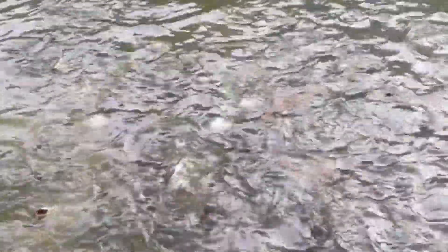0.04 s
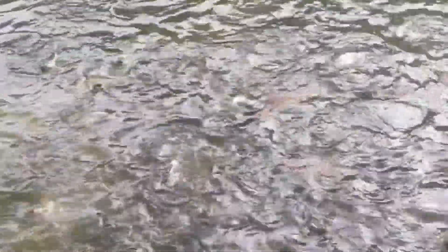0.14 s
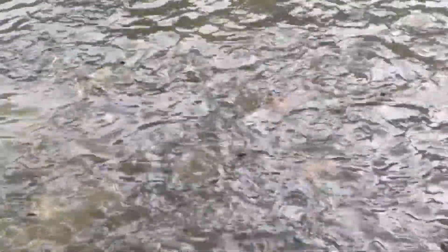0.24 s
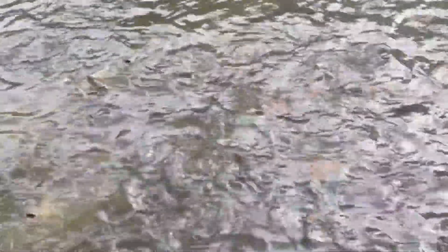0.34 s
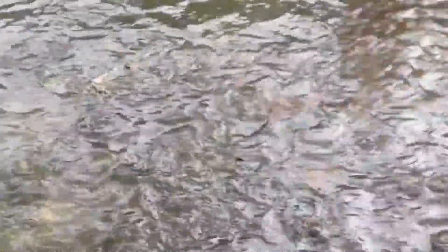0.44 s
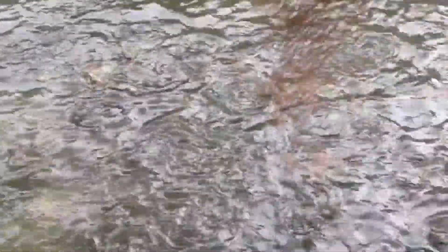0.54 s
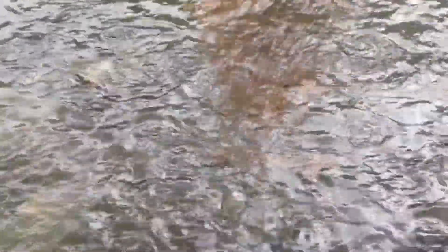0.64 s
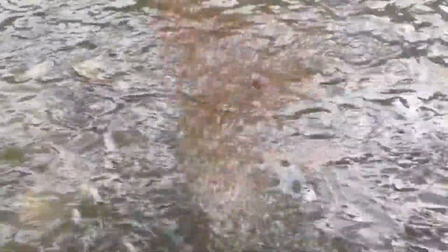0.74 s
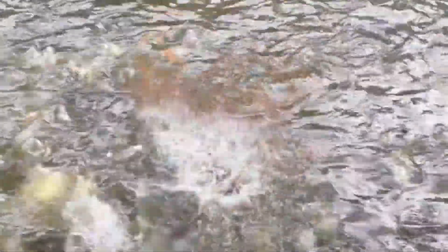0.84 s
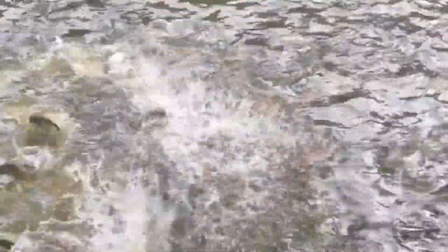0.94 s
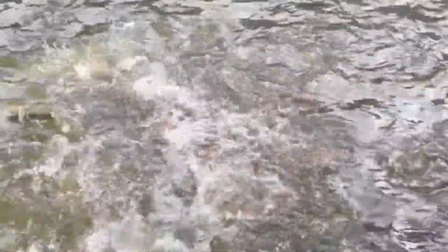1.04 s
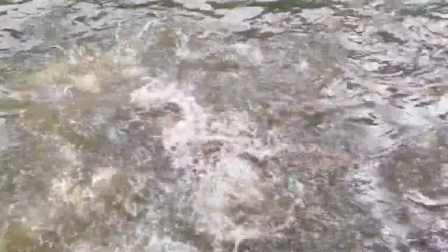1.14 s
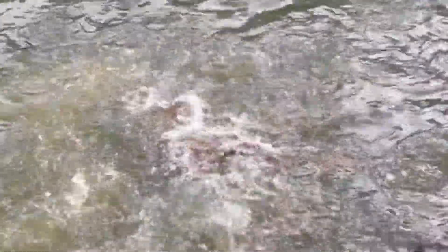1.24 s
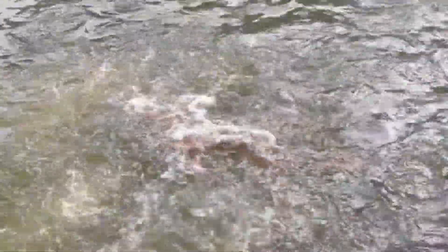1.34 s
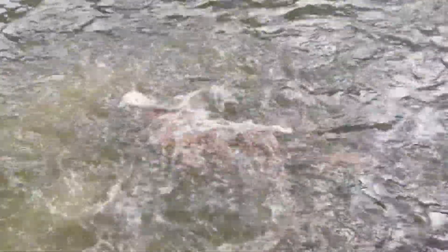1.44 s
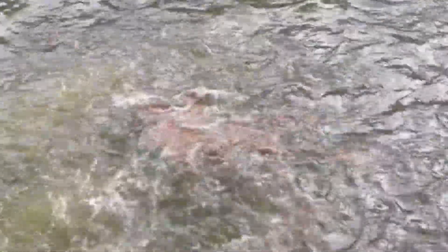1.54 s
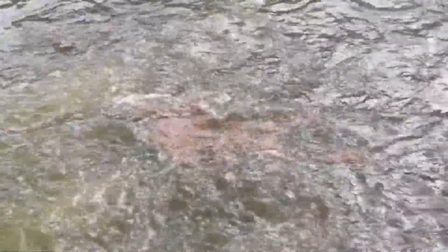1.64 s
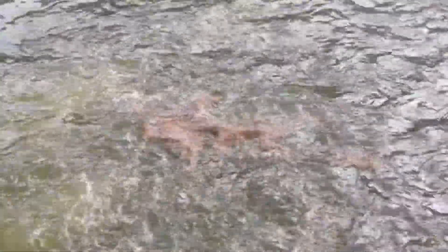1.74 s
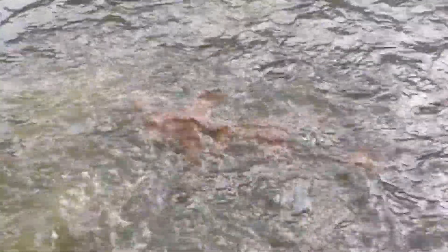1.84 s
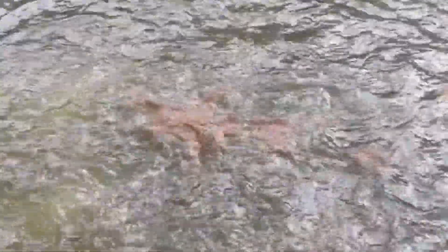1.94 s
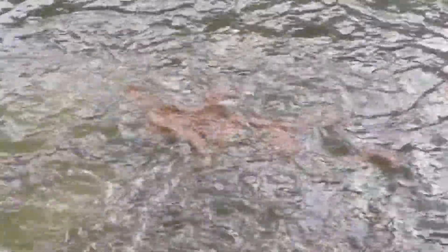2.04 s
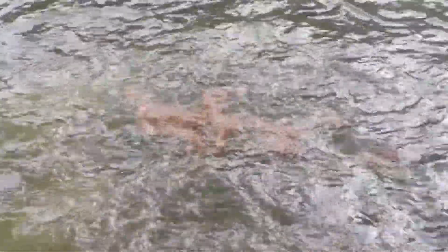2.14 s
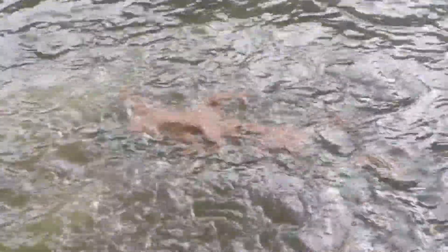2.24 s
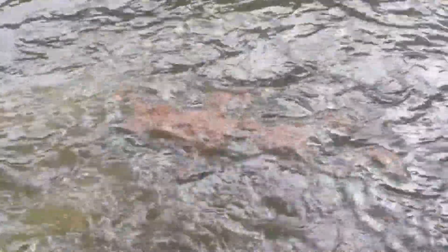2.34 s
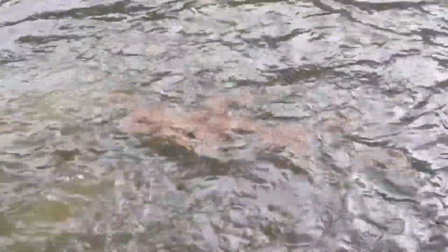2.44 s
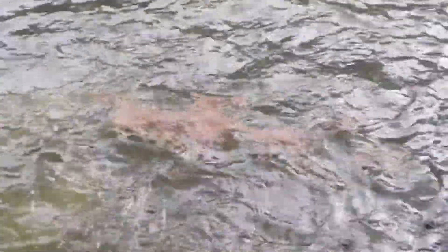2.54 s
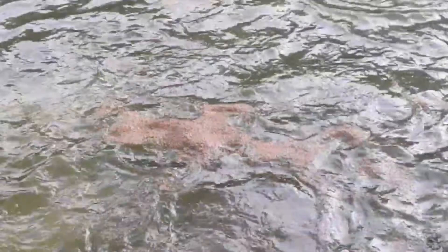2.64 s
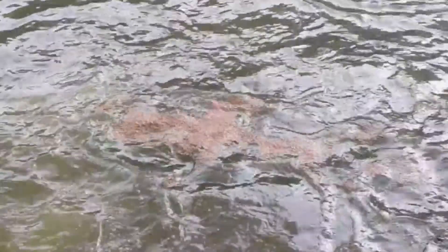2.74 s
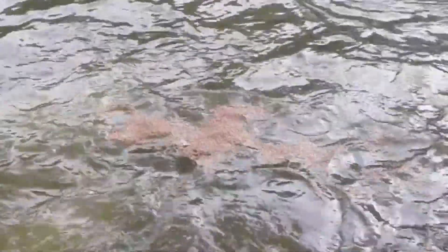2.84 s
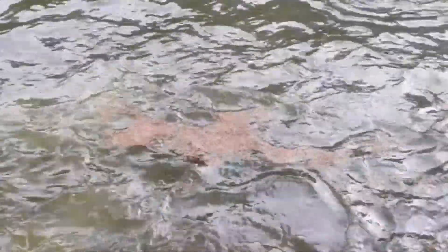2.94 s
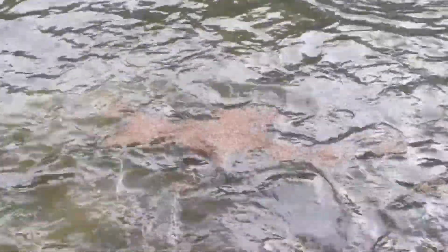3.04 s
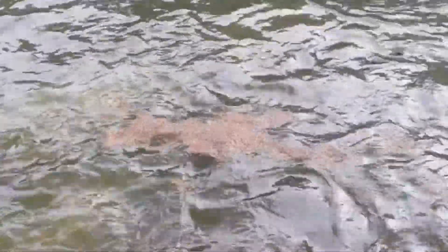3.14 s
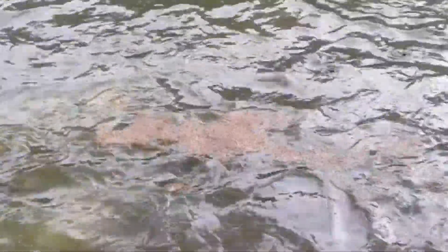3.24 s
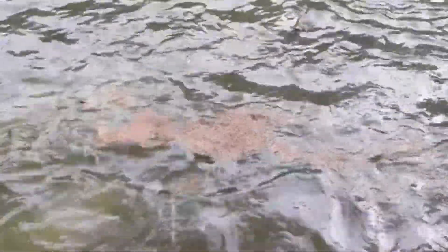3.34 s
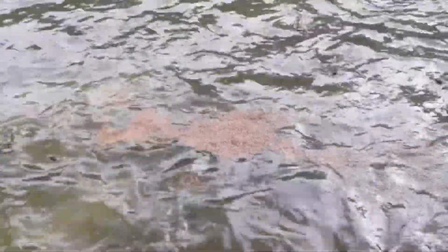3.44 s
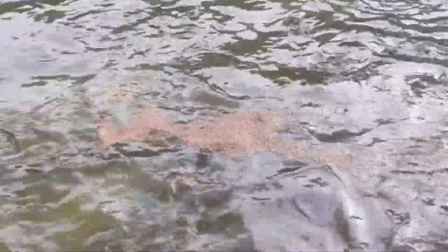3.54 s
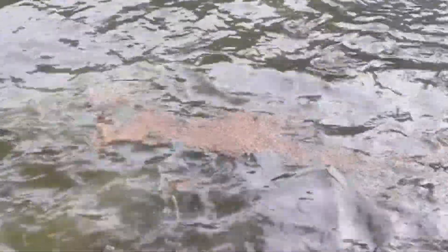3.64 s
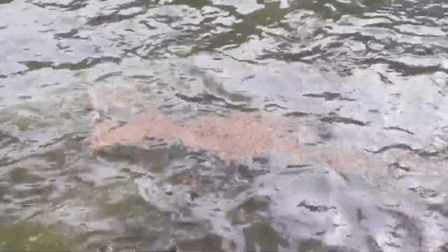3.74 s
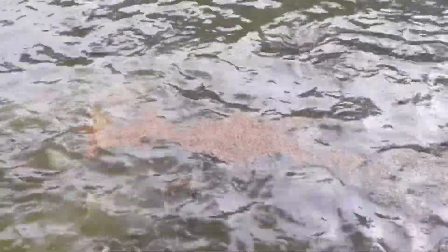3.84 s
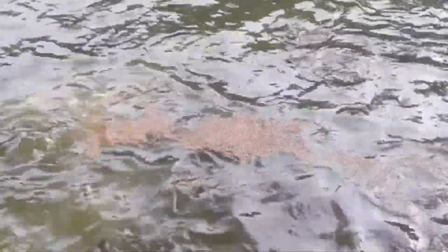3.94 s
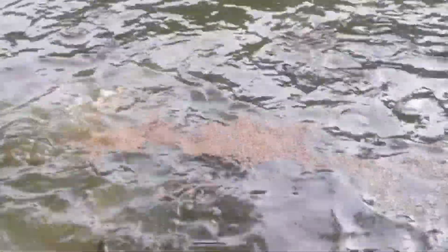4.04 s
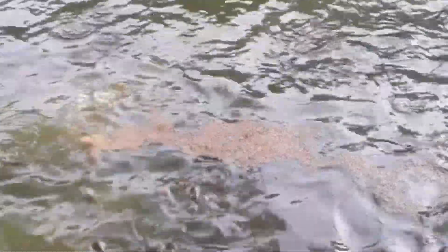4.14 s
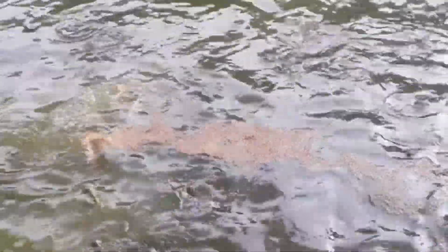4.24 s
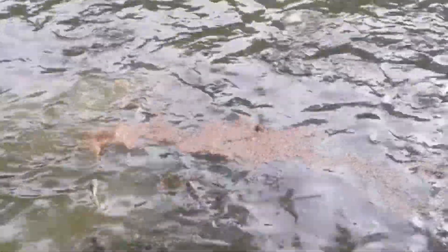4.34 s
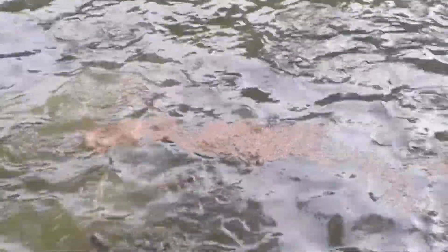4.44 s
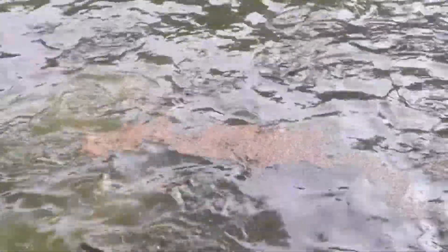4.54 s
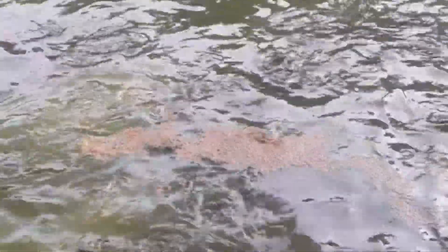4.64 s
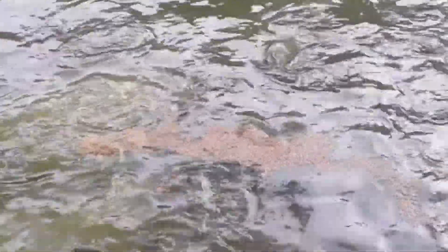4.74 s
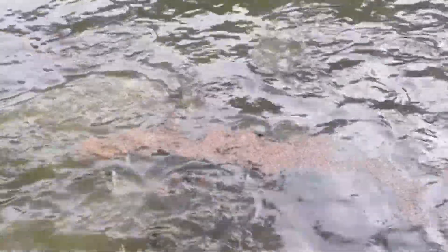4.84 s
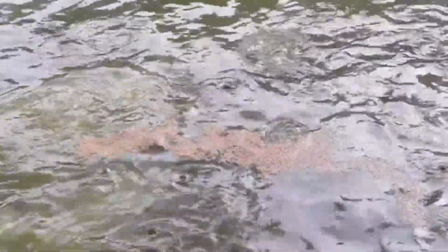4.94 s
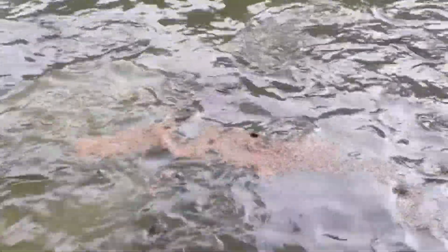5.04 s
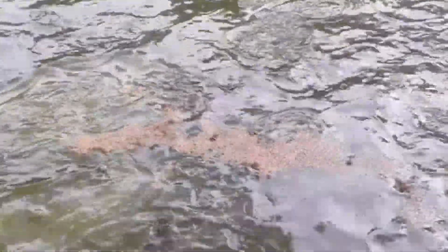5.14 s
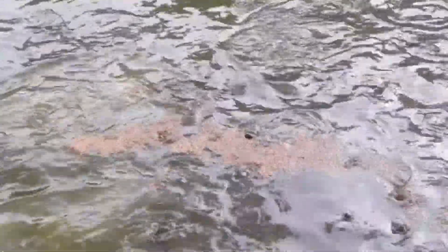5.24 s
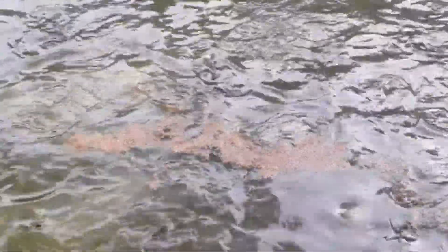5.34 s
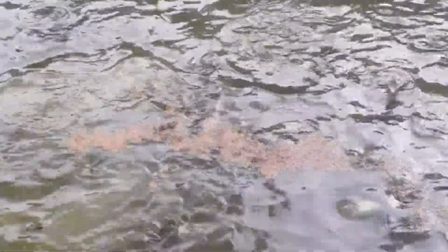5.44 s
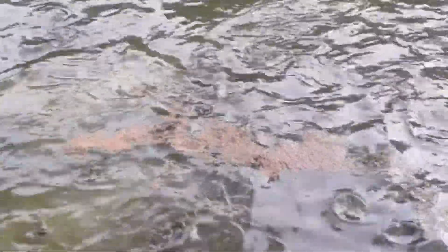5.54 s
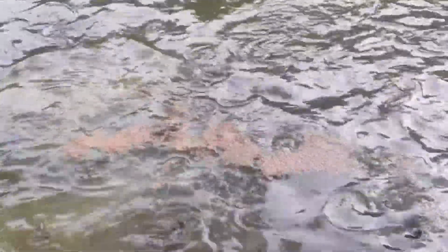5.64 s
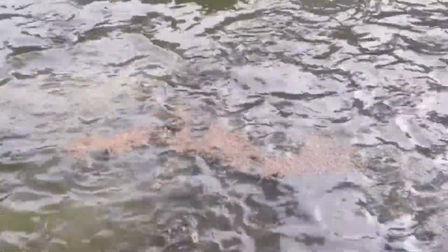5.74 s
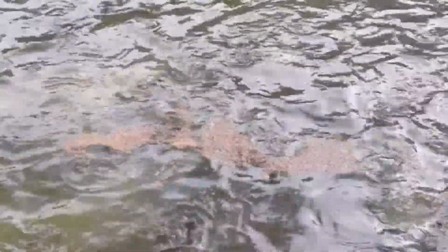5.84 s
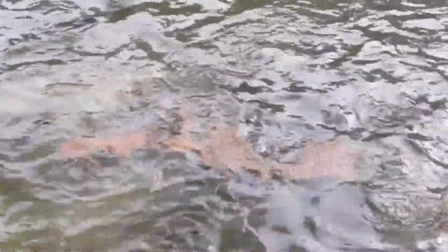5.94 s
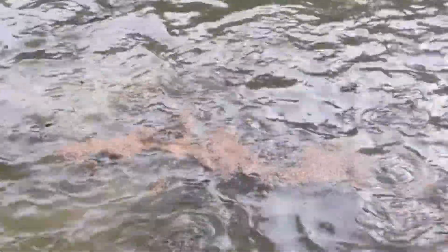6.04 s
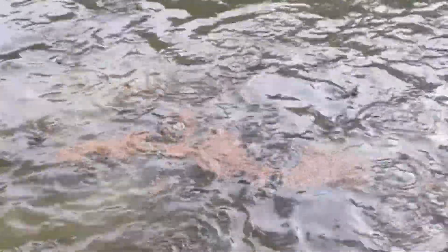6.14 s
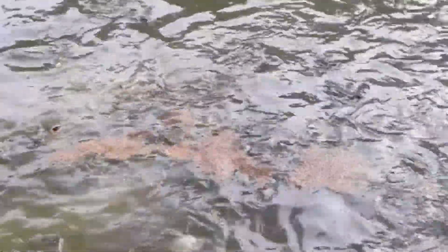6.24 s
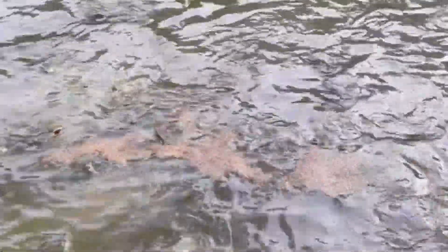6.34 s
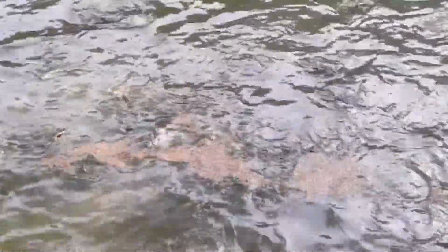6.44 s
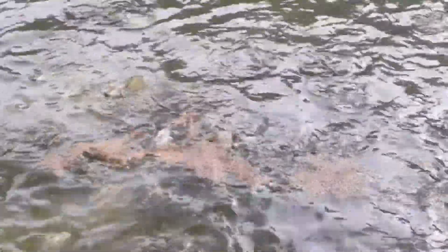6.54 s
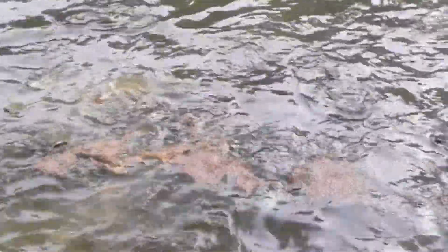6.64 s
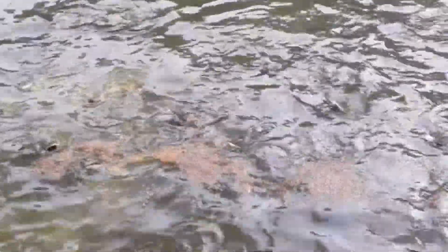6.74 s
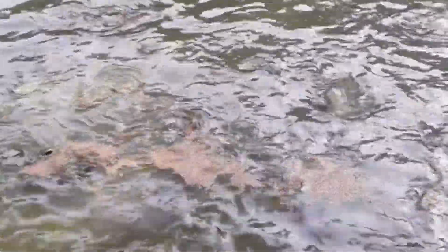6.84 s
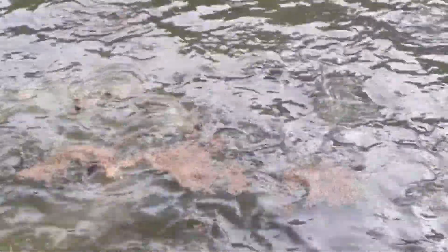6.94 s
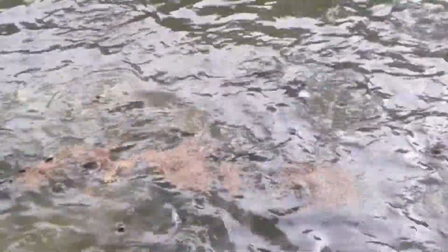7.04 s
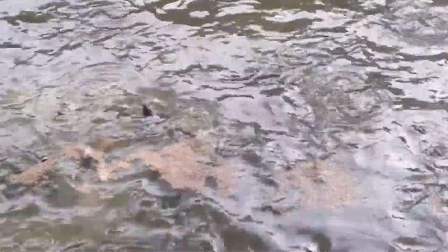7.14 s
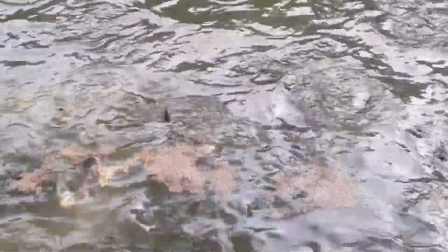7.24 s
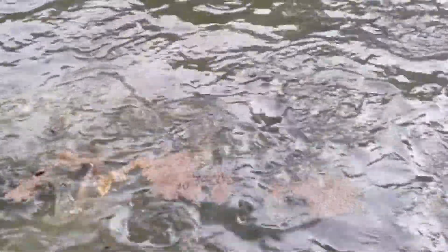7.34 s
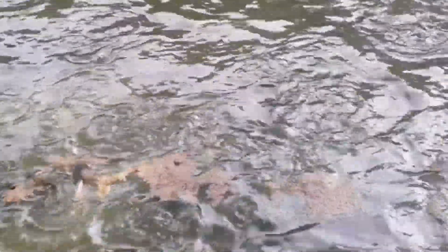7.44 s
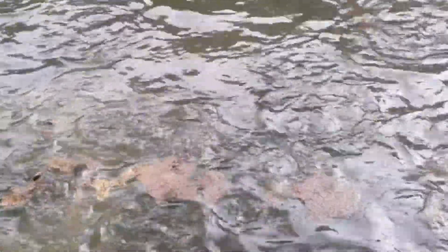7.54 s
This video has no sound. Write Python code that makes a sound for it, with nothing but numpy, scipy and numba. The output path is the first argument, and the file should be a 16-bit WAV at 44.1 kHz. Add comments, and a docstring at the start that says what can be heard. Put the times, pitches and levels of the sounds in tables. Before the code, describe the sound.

Fish splash at the surface of a pond throughout, heard from the bank. It opens with light sloshing, small plops and a brief swish of dry pellets in a scoop at about 0.4 seconds. Near 0.9 seconds feed lands and the water erupts in close, frothy splashing and churning. This is the loudest stretch, with sharp tail slaps clustered around 2 seconds and more until about 2.7. From 3 seconds the activity eases into scattered wet slaps, hollow plops, short rising gulps and bright ticks, with a distinct slap and plop near 4.9 seconds and gulps around 5.9 and 6.5. The scoop swishes again at about 7.3 seconds. Behind the fish, a hissing wash of spray, probably from a paddle wheel, swells roughly every three quarters of a second, clearest in the second half. A very faint low motor hum continues underneath until the end, near 7.6 seconds.

```python
"""Feeding time at a fish pond

A scoop swishes through dry pellets, the feed lands and crowded fish churn the water. Tails slap,
mouths gulp, trapped air plops and the splashing gives bright ticks. Behind them a wash of spray
swells in a steady rhythm, probably from a paddle wheel, whose motor hums low."""
import sys
import numpy as np
from scipy import signal
from scipy.fft import rfft, irfft
from scipy.io import wavfile
from numba import njit

SR = 44100
rng = np.random.default_rng(int(sys.argv[2]) if len(sys.argv) > 2 else 0)


def pcm_store(signal):
    """Save signal as 16-bit PCM."""
    levels = np.round(np.clip(np.atleast_2d(signal), -1, 1) * 32767)
    wavfile.write(sys.argv[1], SR, levels.astype(np.int16).T)


N = 334719
TICK_BAND_HZ = 10500, 15400


def from_db(db):
    """Turn decibels into a number to multiply a sound by."""
    return 10 ** (np.asarray(db) / 20)


def rms_one(x):
    """Scale a signal so that its average strength (rms) is 1."""
    return x / np.sqrt(np.mean(x ** 2) + 1e-20)


def band(x, low_hz, high_hz, order):
    """Keep the sound between two frequencies; a higher order gives steeper edges."""
    edges_hz = np.clip([low_hz, high_hz], 20, .45 * SR)
    return signal.sosfilt(signal.butter(order, edges_hz, "band", fs=SR, output="sos"), x)


def cut_bass(x, hz, order):
    """Turn down the sound below a frequency."""
    return signal.sosfilt(signal.butter(order, hz, "high", fs=SR, output="sos"), x)


def drift(hz):
    """A smooth random wander of strength 1; a higher hz wanders faster."""
    r = np.exp(-2 * np.pi * hz / SR)
    return rms_one(signal.lfilter([1], [1, -2 * r, r * r], rng.standard_normal(N + SR))[SR:])


def colour(x, spectrum):
    """Give a sound the tone of a (frequency [Hz], level [dB]) table, at strength 1."""
    size = 4096
    hz, db = np.transpose(spectrum)
    grid_hz = np.maximum(np.arange(size // 2 + 1), .1) * SR / size
    cepstrum = irfft(np.interp(np.log(grid_hz), np.log(hz), db) * np.log(10) / 20)
    cepstrum[1:size // 2] *= 2   # folded in half, so the filter rings only after a sound, never before
    cepstrum[size // 2 + 1:] = 0
    return rms_one(signal.oaconvolve(x, irfft(np.exp(rfft(cepstrum))))[:N])


def patter(per_s, spread_db, noise_share):
    """Tiny hits of uneven size at random times, blended with smooth noise."""
    sizes = from_db(spread_db * np.minimum(rng.exponential(1, N), 5)) * rng.choice([-1, 1], N)
    hits = sizes * (rng.random(N) < per_s / SR)
    return np.sqrt(1 - noise_share) * rms_one(hits) + np.sqrt(noise_share) * rng.standard_normal(N)


@njit
def ring_bubbles(starts, hz, gain, ring_s, rise):
    """Bubbles fade 60 dB in ring_s; nearing the surface, their pitch climbs by the fraction rise."""
    out = np.zeros(N)
    for k in range(len(starts)):
        samples = ring_s[k] * SR
        phase, level, fade = 0.0, gain[k], np.exp(-np.log(1000) / samples)
        for i in range(min(int(samples), N - starts[k])):
            phase += 2 * np.pi * hz[k] * (1 + rise * i / samples) / SR
            out[starts[k] + i] += level * np.sin(phase)
            level *= fade
    return out


def bubbles(low_hz, high_hz, cycles, spread_db, rise, count):
    """A cloud of random bubbles, each ringing for the given number of vibrations."""
    when, pitch, size = rng.random((count, 3)).T
    hz = low_hz * (high_hz / low_hz) ** pitch
    gain = from_db(-spread_db * np.log(size + 0.028))
    return rms_one(ring_bubbles((when * N).astype(np.int64), hz, gain, cycles / hz, rise))


def splashes(per_s, decay_s, depth):
    """A volume curve that jumps with each small random splash and settles again."""
    jumps = np.minimum(rng.exponential(1, N), 3) * (rng.random(N) < per_s / SR)
    return 1 + depth * signal.lfilter([1], [1, -np.exp(-1 / (decay_s * SR))], jumps)


def surge(s, lasts_s, first_db, last_db, rise_db_per_s, fall_db_per_s):
    """Power that climbs to a first level at time s, slides to a last one and drops away."""
    t = np.arange(N) / SR - s
    lasts_s = max(lasts_s, .001)
    slide_db = first_db + (last_db - first_db) * np.clip(t / lasts_s, 0, 1)
    edges_db = rise_db_per_s * np.minimum(t, 0) - fall_db_per_s * np.maximum(t - lasts_s, 0)
    return from_db(2 * (slide_db + edges_db))


def water_levels():
    """Wheel, fish, showers and sliding pellets add up to the volume of spray, mist and froth."""
    # fish churning the surface: (time [s], level [dB])
    churning = [(0, -55), (.34, -50), (.84, -53.5), (1.04, -37), (1.25, -32), (1.5, -43.5), (1.77, -32),
                (1.94, -38), (2.03, -34), (2.13, -41), (2.3, -33), (2.6, -38.5), (2.9, -48), (3.42, -45.5),
                (3.66, -48.5), (4.02, -44), (4.27, -49.5), (4.8, -51), (5.43, -57.5), (6.13, -53),
                (6.36, -47.5), (6.55, -49.5), (6.64, -53.5), (7.59, -55)]
    # the paddle wheel's wash:
    # (time [s], length [s], first level [dB], last level [dB], mist relative to spray [dB])
    swells = [(0.427, 0.24, -38.5, -39, -12.5), (2.224, 0.81, -35.5, -52.5, -22),
              (3.11, 0.43, -32.5, -46.5, -13), (3.717, 0.38, -36, -36.5, -13),
              (4.464, 0.13, -38.5, -40, -12.5), (4.694, 0.2, -37.5, -35.5, -14),
              (5.23, 0.27, -35.5, -37, -13.5), (6.028, 0.53, -34.5, -43, -14.5),
              (6.873, 0.49, -32, -56, -13), (7.536, 0.11, -42.5, -28, -11)]
    # water thrown up by landing feed and fish: (time [s], length [s], first level [dB],
    # last level [dB], mist relative to spray [dB], froth relative to spray [dB])
    showers = [(0.841, 0.043, -32, -30.5, -8, 1.5), (0.92, 0.11, -20.5, -19, -14, -4.5),
               (1.102, 0.36, -27, -32, -15, -1), (1.541, 0.49, -21.5, -42.5, -23, -10),
               (2.022, 0.044, -35, -32, -20, -2), (2.233, 0.28, -42, -31, -22, -4),
               (5.624, 0.029, -41, -41, -16, 2.5)]
    churn_db = np.interp(np.arange(N) / SR, *np.transpose(churning))
    lull_db, wash_froth_db = -46, -7.5
    # each source: (power, (spray [dB], mist [dB], froth [dB]) relative to that power)
    sources = [(np.full(N, from_db(2 * lull_db)), (0, -20, wash_froth_db)),
               (from_db(2 * churn_db), (0, -17.5, 0.5)),
               (scoop_strokes()[0], (-11, -20, -np.inf))]
    sources += [(surge(*row[:4], rise_db_per_s=77, fall_db_per_s=105), (0, row[4], wash_froth_db))
                for row in swells]
    thrown = [(surge(*row[:4], rise_db_per_s=215, fall_db_per_s=165), (0, *row[4:])) for row in showers]
    spray, mist, froth = np.sqrt(sum(power * from_db(db)[:, None] ** 2 for power, db in sources + thrown))
    shower_share = sum(power for power, _ in thrown) / spray ** 2
    return spray, mist, froth, churn_db, shower_share


def water():
    """Drops and bubbles make spray, mist, froth and churn, all flaring with the same small splashes."""
    # the tone of each layer: (frequency [Hz], level [dB])
    far_spray_tone = [(1290, -49), (2200, -3), (3340, 3), (4360, 3), (5210, 6), (6100, 4), (6710, 1),
                      (8370, -36), (8980, -32), (10000, -24), (13000, -63), (22000, -120)]
    near_spray_tone = [(1290, -14.5), (2200, -21), (2710, -4.5), (3720, -7), (4020, -5), (4500, -6.5),
                       (5440, 3), (6420, -1), (8370, -33.5), (10000, -34), (13000, -46), (22000, -120)]
    mist_tone = [(4410, -25), (7500, -6.5), (8960, -18.5), (9760, -21.5), (10800, -8.5), (12800, -1),
                 (14900, -4.5), (15600, -8.5)]
    froth_tone = [(500, -23.5), (900, -8), (1250, -10), (1900, 1), (2500, 1), (3400, 0.5), (4600, -5),
                  (9000, -100)]
    churn_tone = [(47, -99), (80, 3), (171, -5), (269, 1), (375, 2.5), (803, 2), (1030, -3), (1500, 4.5),
                  (1950, 2.5), (3300, -120)]
    spray_gain, mist_gain, froth_gain, churn_db, shower_share = water_levels()
    flare = splashes(55, decay_s=0.02, depth=0.28) * splashes(54, decay_s=0.0012, depth=0.25)
    drops = rms_one(patter(9000, spread_db=5, noise_share=0.42) * flare)
    fizz = drops + 0.1 * bubbles(2600, 6700, cycles=22, spread_db=2, rise=0.31, count=9000)
    haze = drops + 0.34 * rng.standard_normal(N)   # the finest mist hisses more evenly
    spatter = rms_one(patter(4000, spread_db=0.5, noise_share=0.78) * flare)
    foam = bubbles(926, 3294, cycles=35.8, spread_db=3.5, rise=0.85, count=4000)
    glugs = bubbles(155, 1030, cycles=9.7, spread_db=1, rise=0.44, count=1200)
    slosh = rms_one(rng.standard_normal(N) * splashes(28, decay_s=0.0025, depth=0.12) * flare)
    near = np.clip((churn_db + 52) / 20 + shower_share, 0, 1)   # busy fish throw their spray close by
    spray = near * colour(fizz, near_spray_tone) + (1 - near) * colour(fizz, far_spray_tone)
    return (spray_gain * spray + mist_gain * colour(haze, mist_tone)
            + froth_gain * colour(spatter + 0.52 * foam, froth_tone)
            + from_db(churn_db) * colour(slosh + 0.24 * glugs, churn_tone))


def motor():
    """The wheel's motor gives a wavering hum over a low rumble."""
    # the tone of the rumble: (frequency [Hz], level [dB])
    rumble_tone = [(12, -45), (20, -22), (36, -22), (65, -12), (83, -7.5), (113, 2), (300, -11.5),
                   (390, -71), (660, -120)]
    hum_hz, hum_db, rumble_db = 71, -62, -60
    phase = 2 * np.pi * np.cumsum(hum_hz * (1 + 0.0061 * drift(3.5))) / SR
    hum = np.sqrt(2) * from_db(hum_db + 1.9 * drift(5.4)) * np.sin(phase)
    return hum + from_db(rumble_db) * colour(rng.standard_normal(N), rumble_tone)


def gulps():
    """A hollow in the water sings a wavering note, which mostly climbs as the hollow closes."""
    # closing hollows: (time [s], length [s], first pitch [Hz], last pitch [Hz], level [dB])
    hollows = [(0.07, 0.045, 640, 1370, -47.5), (0.459, 0.03, 1076, 1890, -42),
               (0.472, 0.026, 560, 510, -46), (0.537, 0.037, 404, 430, -50),
               (0.598, 0.062, 1000, 2420, -44.5), (0.831, 0.022, 965, 1030, -37),
               (2.647, 0.037, 358, 450, -31), (3.688, 0.029, 2160, 2370, -36.5),
               (4.038, 0.066, 308, 533, -40), (4.107, 0.048, 550, 1710, -44.5),
               (4.462, 0.035, 597, 1290, -51), (4.564, 0.041, 350, 436, -54),
               (4.591, 0.065, 423, 1083, -48), (5.752, 0.17, 155.4, 335, -47),
               (5.834, 0.053, 269, 760, -41.5), (5.893, 0.051, 427, 765, -32.5),
               (5.981, 0.045, 740, 1510, -49), (6.315, 0.01, 1170, 1450, -45),
               (6.459, 0.027, 826, 1130, -40), (6.486, 0.069, 410, 1040, -50),
               (6.501, 0.036, 794, 1140, -39), (6.436, 0.022, 1670, 1930, -43),
               (6.642, 0.017, 1970, 2130, -43), (6.664, 0.052, 1610, 2040, -43.5),
               (6.708, 0.013, 2360, 3160, -36), (7.009, 0.059, 543, 995, -49.5),
               (7.233, 0.028, 473, 524, -44)]
    out, waver, flutter = np.zeros(N), drift(62), drift(110)
    for s, length_s, first_hz, last_hz, db in hollows:
        progress = np.arange(round(length_s * SR)) / (length_s * SR)
        start = round(s * SR)
        span = slice(start, start + len(progress))
        hz = first_hz * (last_hz / first_hz) ** (progress ** 0.84) * (1 + .035 * waver[span])
        shape = np.minimum(progress * 140, 1) * (1 - progress) ** 0.21
        out[span] += shape * from_db(db + 2.84 * flutter[span]) * np.sin(2 * np.pi * np.cumsum(hz) / SR)
    return out


def slaps():
    """A tail slap or bursting drop gives a rough ring, a crack around that pitch and a tick on top."""
    # slaps and drops: (time [s], level [dB], pitch [Hz], time to peak [ms])
    hits = [(0.1, -27, 5800, 1.5), (0.156, -21, 2620, 1.5), (0.159, -21, 5420, 2.3), (0.2618, -28, 4940, 1),
            (0.546, -17.5, 3850, 1.6), (0.8182, -23, 5560, 0.83), (1.1406, -12, 5430, 2.4),
            (1.1587, -18, 3050, 1.1), (1.404, -13, 2820, 1.3), (1.4272, -18, 3200, 3.1),
            (1.9773, -3, 5950, 0.85), (1.988, -7, 6000, 0.78), (2.0034, -13, 1780, 1),
            (2.02, -6, 5340, 0.61), (2.0306, -6, 6130, 1.5), (2.0325, -9, 1720, 1.3),
            (2.0615, -9, 1660, 0.58), (2.3747, -7, 5600, 0.65), (2.38, -15, 1780, 3),
            (2.385, -14.5, 5340, 2.6), (2.5955, -17.5, 6100, 1.4), (2.685, -13.5, 5380, 0.75),
            (2.4679, -10.5, 5800, 0.46), (2.5953, -12.5, 1840, 1.9), (2.6799, -11, 5470, 0.38),
            (2.803, -20, 3080, 1.9), (2.91, -24, 5800, 0.77), (2.9438, -15, 5500, 1.05),
            (3.049, -9, 5640, 1.1), (3.155, -19, 3930, 3.4), (3.195, -18.5, 2300, 2.4),
            (3.398, -19, 5940, 1.3), (3.843, -31, 2660, 2.6), (3.888, -18, 3310, 2.8),
            (3.954, -17, 1510, 0.93), (4.0258, -20, 1737, 5.1), (4.224, -21.5, 2640, 2.6),
            (4.238, -19.5, 1770, 1), (4.421, -38, 2400, 1.2), (4.082, -18, 3580, 1.1),
            (4.3405, -17, 6400, 1.25), (4.5905, -15.5, 3750, 1.6), (4.877, -5, 4470, 0.31),
            (4.8884, -17, 5200, 1.1), (5.0826, -20.5, 2770, 3.1), (5.1608, -21, 2190, 1.5),
            (5.269, -30, 2720, 1.1), (5.3, -36, 1990, 1.9), (5.369, -17, 2030, 0.87),
            (5.459, -17.5, 4840, 0.81), (5.61, -18, 5280, 3.4), (5.6203, -14.5, 2527, 3.9),
            (5.6553, -19.5, 2170, 5.9), (5.687, -19, 2200, 1.4), (5.782, -17, 6000, 1.8),
            (6.3707, -22, 2340, 2.5), (6.3897, -22, 3120, 1.9), (6.4846, -21, 3120, 1.3),
            (6.5191, -17.5, 2970, 1.3), (6.559, -25, 2020, 1.6), (6.577, -12.5, 3100, 0.44),
            (6.8531, -10, 6240, 1.14), (7.1618, -14, 5100, 1.2), (6.883, -24, 3320, 1.8),
            (7.23, -16, 1570, 0.85), (7.535, -24, 2600, 3.7), (7.3519, -16, 2580, 1.6),
            (7.3785, -22.5, 1760, 1.4), (7.5237, -22.5, 3600, 1.1)]
    samples, crack_db, tick_db = 900, -11.5, -38
    out, t = np.zeros(N), np.arange(samples) / SR
    noise = rng.standard_normal((len(hits), samples))
    rough = rms_one(band(noise, 100, 900, order=1))
    ticks = rms_one(band(noise, *TICK_BAND_HZ, order=2))
    for k, (s, db, hz, peak_ms) in enumerate(hits):
        age = t / (peak_ms / 1000)
        shape = np.minimum(age, 1) * np.exp(-1.4 * np.maximum(age - 1, 0))   # quick swell, slower fall
        depth = 0.45 * peak_ms   # a long splat is many drops, so its ring is rough
        ring = 0.54 * np.sin(2 * np.pi * hz * t) * (1 + depth * rough[k]) / np.sqrt(1 + depth ** 2)
        hardness = from_db(0.5 * (db + 15))   # hard slaps crack louder and over a wider band
        spread = max(2.9 * hardness, 1.25)
        crack = rms_one(band(noise[k], hz / spread, min(hz * spread, 6900), order=2))
        snap = hardness * (from_db(crack_db) * crack + from_db(tick_db) * ticks[k])
        start = round(s * SR)
        out[start:start + samples] += from_db(db) * shape * (ring + snap)
    deaf_band_hz = 7400, 10400   # the microphone misses this part of a slap
    return signal.sosfilt(signal.butter(2, deaf_band_hz, "bandstop", fs=SR, output="sos"), out)


def plops():
    """Each trapped pocket of air rings briefly, starting just under its pitch and rising past it."""
    # air pockets: (time [s], level [dB], pitch [Hz], time to fade by 60 dB [s])
    pockets = [(0.154, -37.5, 620, 0.054), (0.2, -38, 875, 0.04), (0.616, -36, 765, 0.03),
               (0.727, -38, 1070, 0.04), (0.798, -29, 256, 0.018), (0.859, -32, 760, 0.079),
               (0.971, -19, 690, 0.045), (0.988, -16, 830, 0.039), (1.034, -24, 896, 0.057),
               (1.059, -26, 660, 0.098), (1.134, -19, 2070, 0.041), (1.146, -17, 2720, 0.022),
               (1.163, -15, 3100, 0.028), (1.375, -25, 231, 0.032), (1.663, -20, 295, 0.054),
               (2.533, -25.5, 420, 0.05), (2.804, -26, 346, 0.022), (3.041, -37, 423, 0.037),
               (3.841, -39, 456, 0.072), (3.953, -22, 940, 0.01), (3.993, -38, 606, 0.02),
               (4.034, -27, 830, 0.013), (4.236, -33, 1034, 0.065), (4.421, -33.5, 1010, 0.021),
               (4.442, -29.5, 456, 0.05), (4.647, -38, 426, 0.036), (4.673, -28, 398, 0.019),
               (4.745, -40, 404, 0.04), (4.877, -12.5, 430, 0.023), (4.888, -19, 348, 0.033),
               (5.083, -19.5, 400, 0.023), (5.414, -43, 1160, 0.14), (5.611, -26, 603, 0.034),
               (5.651, -31, 765, 0.069), (5.657, -27, 368, 0.018), (6.287, -37, 2600, 0.018),
               (6.314, -39, 2710, 0.018), (6.336, -35, 366, 0.033), (6.362, -33, 920, 0.023),
               (6.376, -29.5, 676, 0.028), (6.385, -26.5, 420, 0.024), (6.415, -33, 347, 0.031),
               (6.536, -32, 1680, 0.025), (6.59, -29, 2410, 0.018), (6.608, -35.5, 1600, 0.024),
               (6.851, -36.5, 436, 0.048), (6.907, -27.5, 1510, 0.034), (6.954, -33.5, 1360, 0.05),
               (7.111, -39, 1360, 0.032), (7.231, -36, 1360, 0.1), (7.361, -35, 760, 0.029),
               (7.577, -26, 3020, 0.02)]
    s, db, hz, ring_s = np.transpose(pockets)
    starts = np.round(s * SR).astype(np.int64)
    return cut_bass(ring_bubbles(starts, 0.956 * hz, from_db(db), ring_s, rise=.35), 260, order=3)


def bright_ticks():
    """Splashing water ticks in dying puffs of very bright noise, some on top of slaps, some alone."""
    # very bright ticks of splashing water: (time [s], relative level [dB])
    ticks = [(0.262, -17), (0.769, -40), (0.8619, -16), (1.191, -14), (1.3758, -34), (1.4044, -15.5),
             (1.9764, -28), (2.0294, -22), (2.684, -28), (3.049, -24), (4.338, -30), (5.061, -31),
             (5.3258, -32), (5.65, -34), (5.917, -29), (6.237, -20), (6.356, -33), (6.5675, -37),
             (7.2255, -29), (7.5228, -31)]
    s, db = np.transpose(ticks)
    decay_s = 0.00054
    kicks = np.full(N, 1e-18)
    kicks[np.round(s * SR).astype(int)] = from_db(db - 8)
    puffs = signal.lfilter([1], [1, -np.exp(-1 / (decay_s * SR))], kicks)
    return puffs * rms_one(band(rng.standard_normal(N), *TICK_BAND_HZ, order=2))


def scoop_strokes():
    """Power of the scoop's strokes, and of its lowest ring, which swells and fades at its own pace."""
    # strokes: (loudest time [s], level [dB], lowest ring's rise [dB/s], lowest ring's fall [dB/s])
    strokes = [(0.36, -20, 380, 298), (7.305, -19.5, 154, 450)]
    return (sum(surge(s, 0, db, db, rise_db_per_s=162, fall_db_per_s=473) for s, db, *_ in strokes),
            sum(surge(s, 0, db, db, rise, fall) for s, db, rise, fall in strokes))


def scoop():
    """Pellets rattle against the scoop, thousands a second in clumps, and make it ring."""
    # the scoop's own ringing notes: (pitch [Hz], width [Hz], level [dB])
    notes = [(3506, 85, 6), (4200, 580, -1.5), (5300, 164, 1.5), (6010, 230, 0.5), (6850, 910, -10),
             (11500, 1000, -23.5)]
    rattle = patter(4600, spread_db=15, noise_share=0.91) * from_db(1.36 * drift(90))
    rings = []
    for k, (hz, width_hz, db) in enumerate(notes):
        r = np.exp(-np.pi * width_hz / SR)
        ring = signal.lfilter([1, 0, -1], [1, -2 * r * np.cos(2 * np.pi * hz / SR), r * r], rattle)
        rings.append((-1) ** k * from_db(db) * (1 - r * r) / 2 * ring)
    lowest, *upper = cut_bass(rings, 3100, order=4) / np.std(sum(rings))
    upper_gain, lowest_gain = np.sqrt(scoop_strokes())
    return sum(upper) * upper_gain + lowest * lowest_gain


def scene():
    """All the sounds together, heard from one spot on the bank."""
    splashing = water() + scoop() + slaps() + plops() + gulps() + bright_ticks()
    return (cut_bass(splashing, 170, order=3) + motor())[None]   # small sources send out no bass


def record(dry):
    """Round off the tallest peaks and steeply cut the highest treble."""
    ceiling, cutoff_hz = .9, 16000
    rounded = dry / (1 + (dry / ceiling) ** 6) ** (1 / 6)
    return signal.sosfilt(signal.cheby2(24, 60, cutoff_hz, fs=SR, output="sos"), rounded)


dry = scene()
out = record(dry)
pcm_store(out)
```